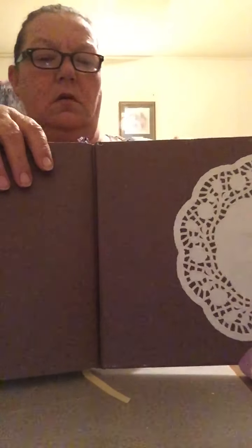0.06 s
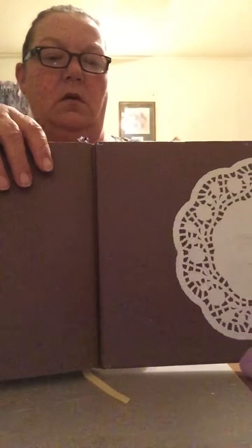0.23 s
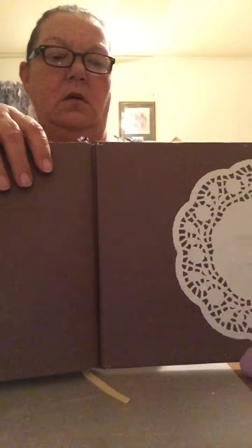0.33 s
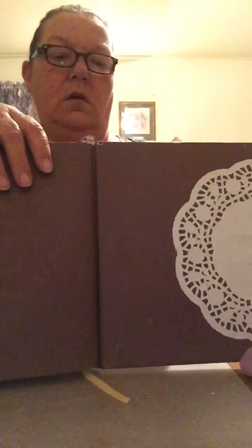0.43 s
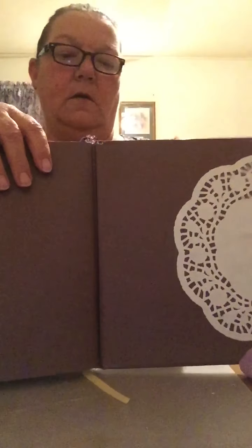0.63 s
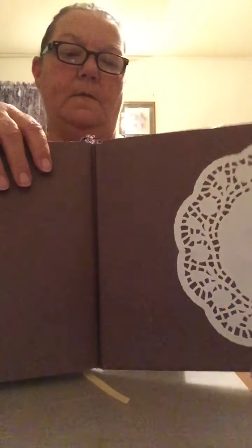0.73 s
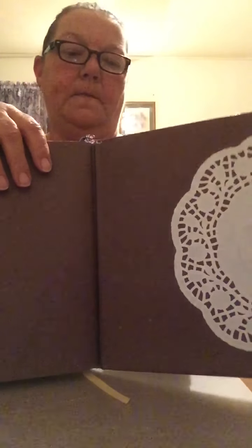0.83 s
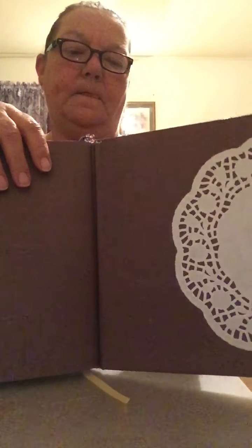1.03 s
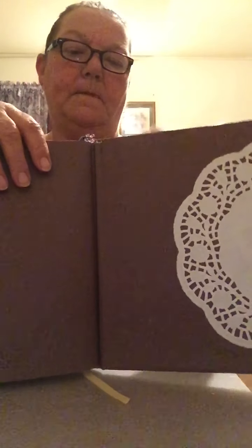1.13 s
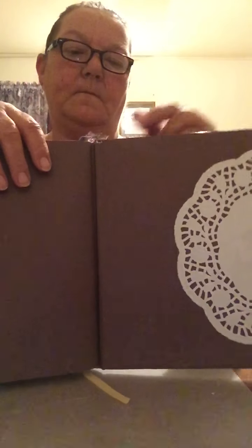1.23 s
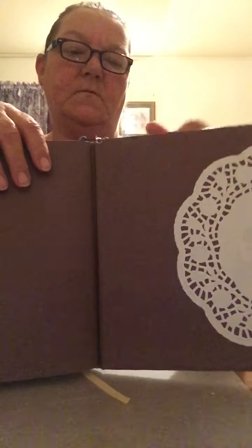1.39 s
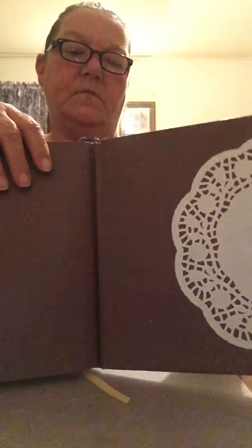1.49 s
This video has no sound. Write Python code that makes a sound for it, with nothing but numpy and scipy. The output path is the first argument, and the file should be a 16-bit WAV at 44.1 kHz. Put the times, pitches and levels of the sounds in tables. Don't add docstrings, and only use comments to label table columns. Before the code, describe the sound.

A hard bead raps a cardboard book cover, then fainter ticks, thuds and rubs over low hum

```python
import sys
import numpy as np
from scipy import signal
from scipy.fft import rfft, irfft, next_fast_len
from scipy.io import wavfile
from scipy.ndimage import uniform_filter1d, map_coordinates

SR = 44100
rng = np.random.default_rng(int(sys.argv[2]) if len(sys.argv) > 2 else 0)


def how_loud(loudness_db):
    steps = np.asarray(loudness_db, float) / 20
    return 10 ** steps


def waveform_to_disk(signal):
    frames = np.transpose(np.atleast_2d(signal))
    scaled = np.clip(frames, -1, 1) * 32767
    samples = np.round(scaled).astype(np.int16)
    wavfile.write(sys.argv[1], SR, samples)


N = 68355

# t/s, peak level/dB, tilt/(dB per octave)
RAPS = [
    (0.2476, 0, 3),
    (0.2714, -18, 3.5),
    (0.652, -38.5, -0.5),
    (1.4339, -27.5, 0),
]
# f/Hz, level/dB, t60/s
COVER_MODES = [(339.7, -9.5, 0.17), (400.7, -14, 0.21), (581, -9.5, 0.076), (939, -12, 0.067),
               (994, 9, 0.016), (1230, 5.5, 0.013), (1360, -11.5, 0.037), (1468, -8.5, 0.05),
               (1900, -5.5, 0.022), (2314, -5, 0.026), (3122, 9, 0.0079), (3800, 1.5, 0.0086),
               (5240, -10.5, .008), (6400, -17, 0.01)]
SCATTER_DB = 2
CRACK_DB, CRACK_S, CRACK_DULL_HZ = -27.5, 0.016, 6000
CONTACT_S, COVER_CUT_HZ = 0.00047, 85
OFF_AXIS_DAMPING, RAP_ROOM_DB = 2.05, 0
# f/Hz, level/dB, t60/s
FITTINGS = [(625, -54, .4), (1103, -59, 1.8), (1239, -52, 1.0), (1588, -59, 1.0), (1690, -60, 1.1),
            (2400, -60, 1.2), (2250, -50, .2), (1900, -48, .2)]
FITTING_FUZZ_HZ, FITTING_FUZZ = 25, .6

# t/s, peak level/dB, f/Hz, t60/s
THUDS = [(.164, -23.5, 86.6, 0.05), (.185, -40, 146.4, 0.87), (.205, -39.5, 204, 0.074),
         (.44, -79, 266, 0.15), (.445, -39, 142.7, 0.16), (.503, -36.5, 664, 0.06), (.538, -38, 654, 0.056),
         (.6513, -26.5, 355.3, 0.022), (.6513, -31.5, 913, 0.033), (.6513, -34, 621, 0.026),
         (.6513, -29.5, 813, 0.017), (1.399, -23, 143, 0.066), (1.399, -27.5, 308, 0.05),
         (1.399, -32, 661, 0.04), (1.46, -45, 61, 0.25), (1.468, -38.5, 146, 0.094),
         (1.54, -57, 149, 0.055)]
# t/s, peak level/dB, f/Hz, t60/s
PINGS = [(0.341, -43.5, 3900, 0.1), (.374, -41.5, 3450, 0.17), (.500, -42, 6800, 0.04),
         (.589, -49, 5240, 0.029), (.589, -50.5, 3800, 0.037), (1.056, -55, 3600, 0.082),
         (1.058, -59, 5600, 0.078), (1.070, -53, 3500, .05), (1.097, -52, 3600, .03),
         (1.287, -50.5, 3850, 0.048), (1.27, -57.5, 1900, 0.057), (1.290, -55, 3350, .05),
         (.147, -55.5, 1550, 0.097), (1.2, -58, 4200, .025), (0.82, -68, 2600, .3), (.966, -67, 1900, .3),
         (.150, -63, 4100, .1), (1.366, -47, 1000, .04), (1.2, -51.5, 320, 0.13)]
THUD_RISE_CYCLES = 0.54

# t/s, peak level/dB, f/Hz, life/s
TICKS = [(.009, -41, 5220, 0.0058), (0.146, -45.5, 2260, 0.0083), (.224, -52, 2160, 0.048),
         (.386, -44.5, 3535, 0.069), (.501, -48, 6640, 0.0038), (0.502, -42.5, 13000, 0.019),
         (.526, -34.5, 3350, 0.0034), (0.54, -33, 4340, 0.0045), (.590, -55, 15100, 0.006),
         (0.59, -49.5, 3300, 0.013), (.874, -49.5, 13590, 0.012), (1.434, -34.5, 7800, 0.0099),
         (1.291, -55, 1900, 0.012), (0.965, -51.5, 7000, 0.005), (1.003, -53.5, 3590, 0.0064),
         (1.1, -50.5, 3550, 0.0055), (.2717, -35.5, 6400, 0.0082), (1.208, -57.5, 3554, 0.011),
         (0.348, -46, 13200, 0.0058), (1.349, -44, 3090, 0.022), (1.356, -36.5, 1598, 0.012),
         (1.357, -32.5, 4760, 0.0053), (1.406, -44, 8100, 0.0051), (1.423, -46, 3200, 0.0035),
         (1.456, -46, 3500, .008), (1.466, -39, 1620, 0.0041), (1.482, -34, 3840, 0.004),
         (1.4805, -43, 13000, 0.0089), (1.491, -39.5, 3500, 0.0045), (1.534, -64.5, 3585, 0.0025),
         (0.256, -31, 3600, 0.007), (0.451, -41.5, 3760, 0.0042), (.471, -40, 3550, 0.0034),
            (0.505, -41, 2440, 0.0055), (0.506, -23, 1630, 0.0024), (0.516, -37, 2440, 0.0036),
            (.526, -36, 8200, 0.0045), (.537, -41, 8420, 0.0035), (.546, -40, 5400, 0.0053),
            (1.379, -48, 5350, .004), (1.418, -41, 5000, .004), (1.43, -37, 4460, 0.0037),
            (1.4352, -25.5, 3387, 0.01), (1.4345, -38, 14000, 0.0036), (1.439, -33.5, 3340, 0.0049),
            (1.447, -49, 5050, 0.0053), (1.459, -45, 3440, 0.0025), (1.462, -33.5, 890, 0.0075),
            (1.473, -55, 4000, 0.0023), (.875, -52.5, 3506, 0.0038), (0.967, -46, 13900, .006)]
TICK_Q, TICK_RISE_S = 5, .0002
TICK_SNAP_DB, SNAP_DB_PER_OCTAVE, SNAP_SHORTER = -12, 4, 2.5

# start t/s, length/s, card level/dB, skin level/dB, sliding bead level/dB
RUBS = [(-.02, 0.036, -56, -49.5, -88), (0.006, 0.027, -74, -59, -76), (0.106, 0.29, -67, -88, -86),
        (0.322, 0.061, -49.5, -62, -46), (0.35, 0.18, -55.5, -93, -52), (0.497, 0.0047, -37, -45.5, -76.5),
        (0.514, 0.032, -47, -49, -79), (0.541, 0.15, -65, -96, -82), (0.916, 0.2, -67, -76, -84),
        (1.048, 0.03, -75.5, -81, -62.5), (1.085, 0.015, -93, -71, -80.5), (1.283, 0.02, -66, -86, -64),
        (1.334, 0.025, -53.5, -62, -53), (1.402, 0.028, -56.5, -59, -58), (1.43, 0.036, -49.5, -56, -58),
        (1.467, 0.024, -65, -61, -82), (1.353, .006, -63, -48, -68)]
# f/Hz, width/Hz, level/dB
CARD = [(632, 110, 0.5), (1234, 80, 2.5), (1610, 550, -10.5), (2480, 480, -4), (3300, 2400, -14),
        (6430, 500, -12.5)]
# f/Hz, width/Hz, level/dB
BEADS = [(2400, 300, -11), (3450, 450, 1.5), (3900, 330, 1), (4370, 300, -2), (5700, 2000, -5.5),
         (7000, 3300, -15.5)]
# f/Hz, level/dB
SKIN = [(300, -34), (700, -9), (1500, -0.5), (3000, -16), (8000, -5), (10500, -12.5), (13000, -12),
        (16000, -6.5)]
GRAINS_PER_S, GRAIN_DB, RUB_NOISE, STICK_SLIP_DB = 3900, 1.5, .8, 2.2
RUB_RISE_SHARE, RUB_SAG_DB = .33, 3
RUB_FALL_S, RUB_FALL_PER_S = .009, .12

# t/s, level/dB, f/Hz
DRAG = [(0.429, -52, 267.5), (0.46, -53, 278.6), (.55, -56, 308.4), (.6, -68.5, 320.3), (0.819, -81, 312.1),
        (0.86, -64, 318.8), (0.921, -56, 327.2), (1.0, -62.5, 319.2), (1.101, -57.5, 327.3),
        (1.202, -61.5, 310.2), (1.331, -73, 305), (1.431, -45.5, 306), (1.49, -72.5, 298.4),
        (1.55, -64, 285)]
DRAG_WIDTH_HZ, DRAG_STEADY = 89, .8
DRAG_UPPER_RATIO, DRAG_UPPER_DB = 1.3, -10.5

# f/Hz, t60/s
ROOM_DECAY = [(200, 0.28), (1000, 0.2), (2200, 0.28), (4000, 0.16), (12000, 0.13)]
# delay t/s, level/dB
WALLS = [
    (0.011, -28.5),
    (0.026, -26),
]
ROOM_DB, ROOM_DELAY_S, ROOM_DULL_HZ = -11, .003, 5000

# t/s, twice the shaft rate f/Hz, level/dB, load/dB
MOTOR = [(0, 93.45, -57, 7), (.15, 91.2, -55.5, 1), (.3, 92.3, -53, 9), (.5, 92.53, -48.5, 14),
         (0.598, 92.04, -52, -4), (0.849, 95.05, -49, -22), (0.949, 94.14, -62, 4.5),
         (0.998, 97.34, -49.5, -14), (1.167, 89.8, -56.5, 14.5), (1.25, 98.15, -51.5, 1),
         (1.36, 95.6, -61, -0.5), (1.55, 102.2, -63.5, 6)]
# order, level/dB, share of load
ORDERS = [(1, -2, 0.12), (2, 0.5, 0), (3, -16.5, 0.96)]
FLUTTER_DB, FLUTTER_HZ = -0.5, 17
MAINS_HZ, MAINS_DB = 60.4, -58.5
# f/Hz, level/dB per Hz
RUMBLE = [(30, -44.5), (45, 13.5), (70, 16.5), (130, 2), (250, -33.5)]
RUMBLE_DB, RUMBLE_DB_PER_S = -52.5, -10
# f/Hz, level/dB per Hz
AIR = [(15, -45.5), (38, -14.5), (108, -2), (212, -19), (754, -30.5), (1100, -26.5), (1840, -33.5),
       (2410, -32), (16000, -42.5)]
AIR_DB = -60

LOW_CUT_HZ, TOP_HZ, LIMIT = 17, 15900, .87


def raps(damping):
    out, t = np.zeros(N + SR), np.arange(SR // 3) / SR
    hz, level, t60 = np.transpose(COVER_MODES)[:, :, None]
    dull = signal.butter(2, CRACK_DULL_HZ, fs=SR, output="sos")
    for s, db, tilt in RAPS:
        vary = SCATTER_DB * rng.standard_normal(hz.shape)
        mode_db = level + vary + tilt * np.log2(hz / 1000) - 60 * t * damping / t60
        ring = (how_loud(mode_db) * np.sin(2 * np.pi * hz * t)).sum(0)
        noise = signal.sosfilt(dull, rng.standard_normal(len(t)))
        crack = how_loud(CRACK_DB + 2 * tilt - 60 * t / CRACK_S) * noise
        onset = (1 - np.exp(-t * damping / CONTACT_S)) ** 2
        out[round(s * SR):][:len(t)] += how_loud(db) * (ring / 3 + crack) * onset
    return low_cut(out[:N], COVER_CUT_HZ)


def fittings():
    t = np.clip(np.arange(N) / SR - RAPS[0][0], 0, None)
    out = np.zeros(N)
    for hz, db, t60 in FITTINGS:
        fuzz = 1 + FITTING_FUZZ * wobble(FITTING_FUZZ_HZ)
        out += how_loud(db - 60 * t / t60) * fuzz * np.sin(2 * np.pi * hz * t)
    return out


def thuds():
    out, t = np.zeros(N + SR), np.arange(SR // 3) / SR
    for s, db, hz, t60 in THUDS + PINGS:
        swell = 1 - np.exp(-t * hz / THUD_RISE_CYCLES)
        out[round(s * SR):][:len(t)] += how_loud(db - 60 * t / t60) * swell * np.sin(2 * np.pi * hz * t)
    return out[:N]


def ticks():
    out, t = np.zeros(N + SR), np.arange(SR // 20) / SR
    for s, db, hz, life in TICKS:
        steps = uniform_filter1d(rng.standard_normal(len(t)), size=6)
        drift = np.cumsum(steps) * np.sqrt(2 * np.pi * hz / TICK_Q / SR)
        snap_db = TICK_SNAP_DB + SNAP_DB_PER_OCTAVE * np.log2(hz / 3000) - 30 * SNAP_SHORTER * t / life
        body = np.sin(2 * np.pi * hz * t + drift) + how_loud(snap_db) * rng.standard_normal(len(t))
        envelope = how_loud(db - 30 * t / life) * (1 - np.exp(-t / TICK_RISE_S))
        out[round(s * SR):][:len(t)] += envelope * body
    return out[:N]


def rubs():
    t = np.arange(N) / SR
    struck = rng.random(N) < GRAINS_PER_S / SR
    grains = struck * how_loud(GRAIN_DB * rng.exponential(size=N)) * rng.standard_normal(N)
    hiss = rng.standard_normal(N)
    slow = uniform_filter1d(uniform_filter1d(hiss, size=150), size=90)
    stick_slip = how_loud(STICK_SLIP_DB * unit(slow))
    scratch = (unit(grains) + RUB_NOISE * hiss) * stick_slip
    card = resonant(scratch, CARD)
    skin = coloured(scratch, SKIN)
    beads = low_cut(resonant(scratch, BEADS), 1800)
    layers = np.array([card, skin, beads])
    out = np.zeros(N)
    for s, length, *db in RUBS:
        rise = np.clip((t - s) / (RUB_RISE_SHARE * length), 0, 1) ** 2
        sag = how_loud(-RUB_SAG_DB * np.clip((t - s) / length, 0, 2))
        fall_s = RUB_FALL_S + RUB_FALL_PER_S * length
        fall = np.exp(-np.clip(t - s - length, 0, None) / fall_s)
        out += rise * sag * fall * (how_loud(db) @ layers)
    return out


def drag():
    s, db, hz = np.transpose(DRAG)
    t = np.arange(N) / SR
    fuzz = wobble(DRAG_WIDTH_HZ) + 1j * wobble(DRAG_WIDTH_HZ)
    turn = 2j * np.pi * np.cumsum(np.interp(t, s, hz)) / SR
    lower = (DRAG_STEADY + fuzz) * np.exp(turn)
    upper = how_loud(DRAG_UPPER_DB) * fuzz[::-1] * np.exp(DRAG_UPPER_RATIO * turn)
    return how_loud(np.interp(t, s, db, left=-120, right=-120)) * unit(np.real(lower + upper))


def room(x):
    hz, t, z = signal.stft(rng.standard_normal(SR // 2), SR, nperseg=256)
    decay = how_loud(-60 * t / along(ROOM_DECAY, hz)[:, None])
    tail = signal.istft(z * decay, SR, nperseg=256)[1]
    tail = how_loud(ROOM_DB) * tail / np.linalg.norm(tail)
    tail = np.pad(tail, (round(ROOM_DELAY_S * SR), 0))
    for s, db in WALLS:
        tail[round(s * SR)] += how_loud(db)
    dull = signal.butter(2, ROOM_DULL_HZ, fs=SR, output="sos")
    return signal.fftconvolve(signal.sosfilt(dull, x), tail)[:N]


def hum():
    s, hz, db, load = np.transpose(MOTOR)
    t = np.arange(N) / SR
    fade_db = RUMBLE_DB_PER_S * t
    turn = np.pi * np.cumsum(np.interp(t, s, hz)) / SR
    lines = np.zeros(N)
    for k, level, share in ORDERS:
        flutter_db = FLUTTER_DB * wobble(FLUTTER_HZ)
        line_db = level + (k == 1) * fade_db + share * np.interp(t, s, load) + flutter_db
        lines += how_loud(line_db) * np.sin(k * turn + 6 * rng.random())
    rumble = how_loud(RUMBLE_DB + fade_db) * coloured(rng.standard_normal(N), RUMBLE)
    mains = how_loud(MAINS_DB + fade_db) * np.sin(2 * np.pi * MAINS_HZ * t)
    air = how_loud(AIR_DB) * coloured(rng.standard_normal(N), AIR)
    return np.sqrt(2) * how_loud(np.interp(t, s, db)) * lines + mains + rumble + air


def unit(x):
    return x / np.sqrt(np.mean(x ** 2) + 1e-20)


def along(points, hz):
    f, v = np.transpose(points)
    return np.interp(np.log(hz + 1), np.log(f + 1), v)


def filtered(x, response):
    m = next_fast_len(N + SR // 2)
    return irfft(rfft(x, m) * response(np.fft.rfftfreq(m, 1 / SR)), m)[:N]


def coloured(x, spectrum):
    return unit(filtered(x, lambda hz: how_loud(along(spectrum, hz)) * (hz > spectrum[0][0]) * (hz < TOP_HZ)))


def resonant(x, peaks):
    def response(f):
        total = 0
        for k, (centre, width, db) in enumerate(peaks):
            loss = 1j * f * width
            total = total + (-1) ** k * how_loud(db) * loss / (centre * centre - f * f + loss)
        return total
    return unit(filtered(x, response))


def wobble(rate):
    return map_coordinates(rng.standard_normal(N // 50), [np.arange(N) * rate / SR])


def low_cut(x, cut_hz):
    return signal.sosfilt(signal.butter(4, cut_hz, "high", fs=SR, output="sos"), x)


def scene():
    small = low_cut(ticks() + rubs(), COVER_CUT_HZ)
    off_axis = how_loud(RAP_ROOM_DB) * OFF_AXIS_DAMPING * raps(OFF_AXIS_DAMPING)
    wet = room(small + off_axis)
    return (raps(0.99) + small + wet + thuds() + drag() + fittings() + hum())[None]


def roll_off(x):
    return signal.sosfilt(signal.butter(12, 16680, fs=SR, output="sos"), x)


def record(dry):
    x = low_cut(dry[0], LOW_CUT_HZ)
    x = x / (1 + np.abs(x / LIMIT) ** 6) ** (1 / 6)
    mix = filtered(x, lambda hz: 1 / (1 + (hz / TOP_HZ) ** 80))[None]
    return roll_off(mix)


dry = scene()
out = record(dry)
waveform_to_disk(out)
```